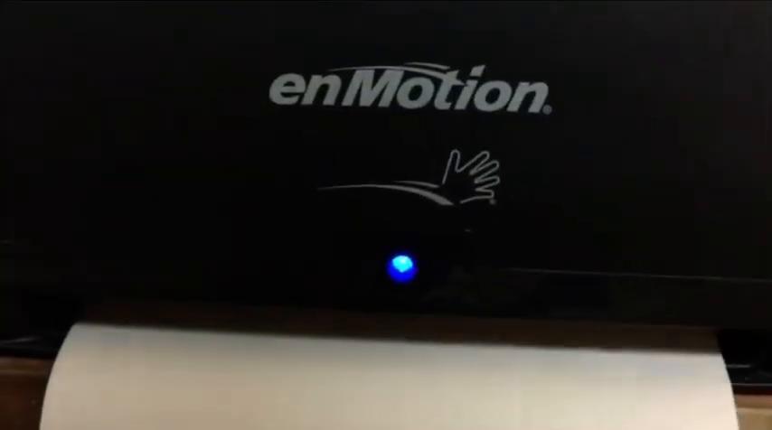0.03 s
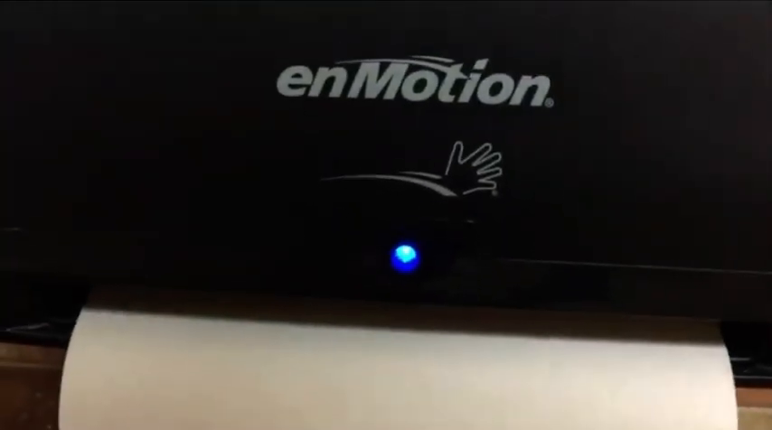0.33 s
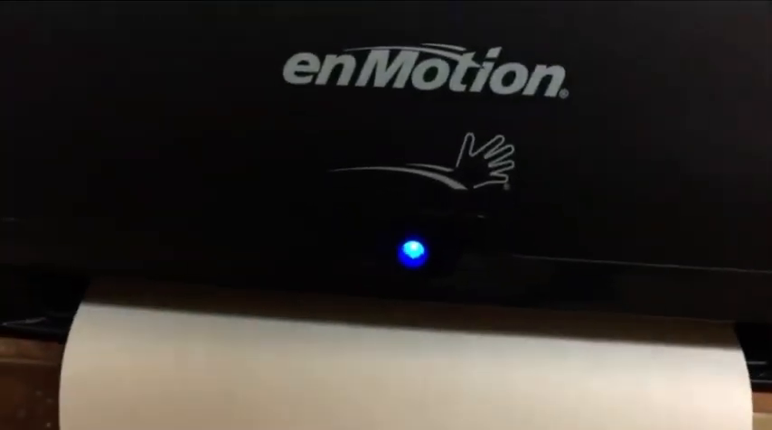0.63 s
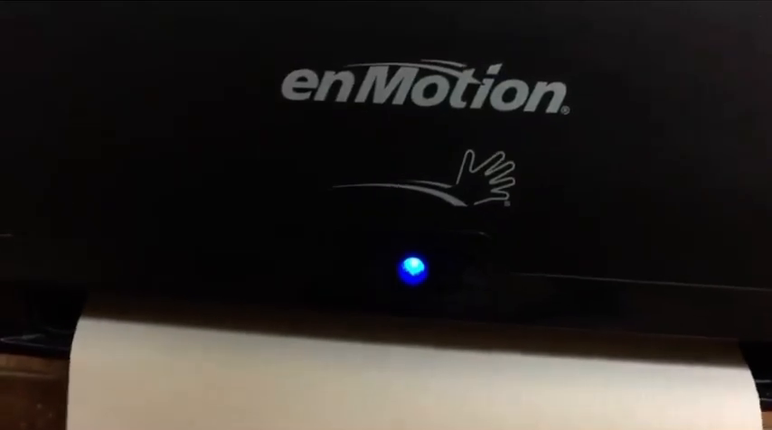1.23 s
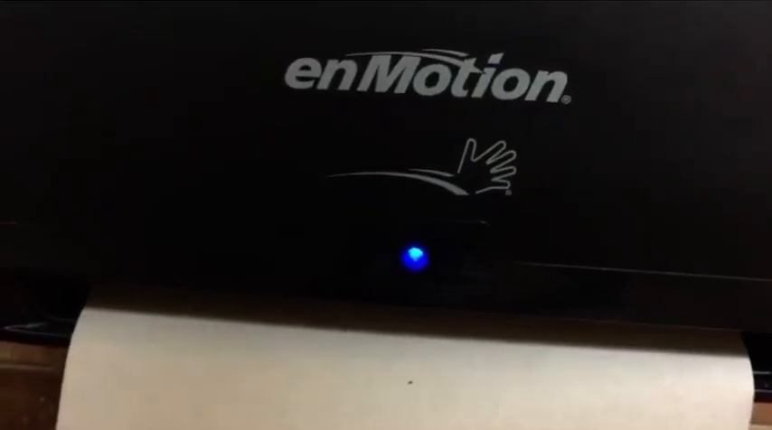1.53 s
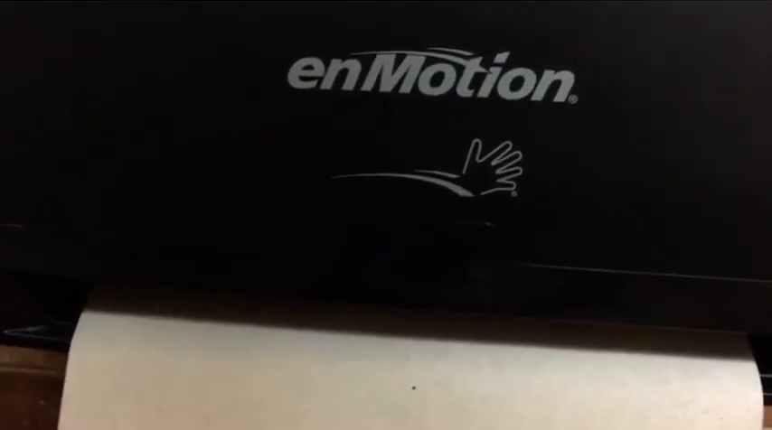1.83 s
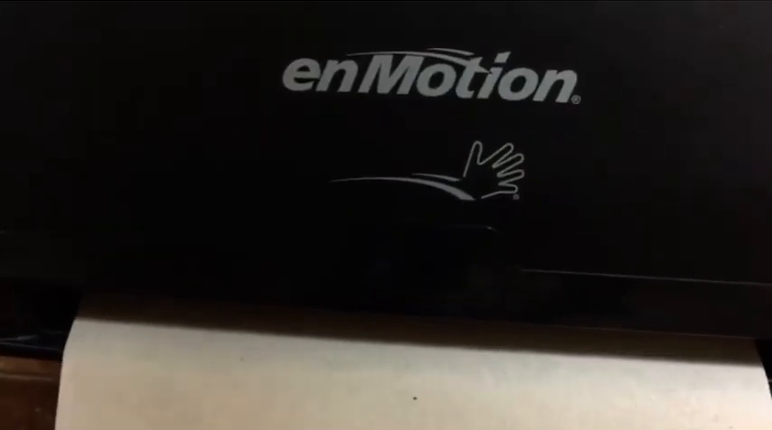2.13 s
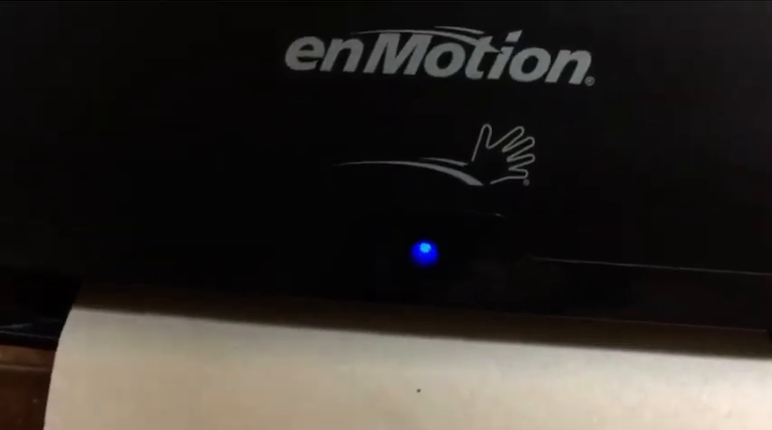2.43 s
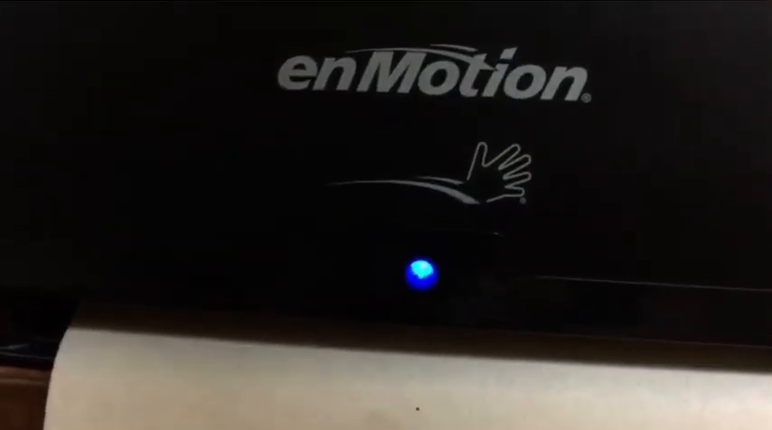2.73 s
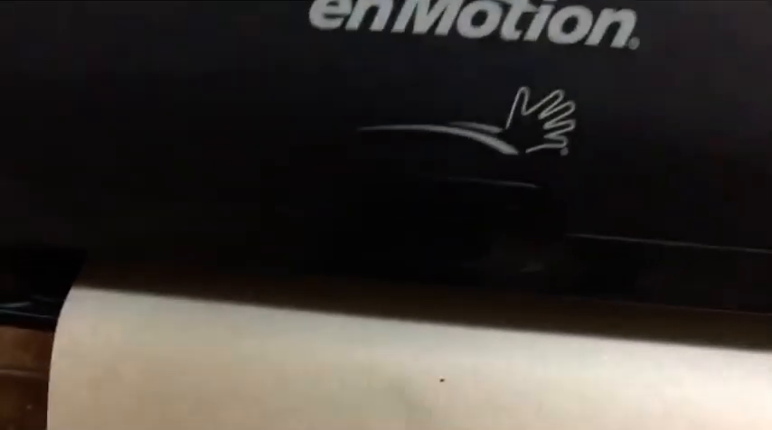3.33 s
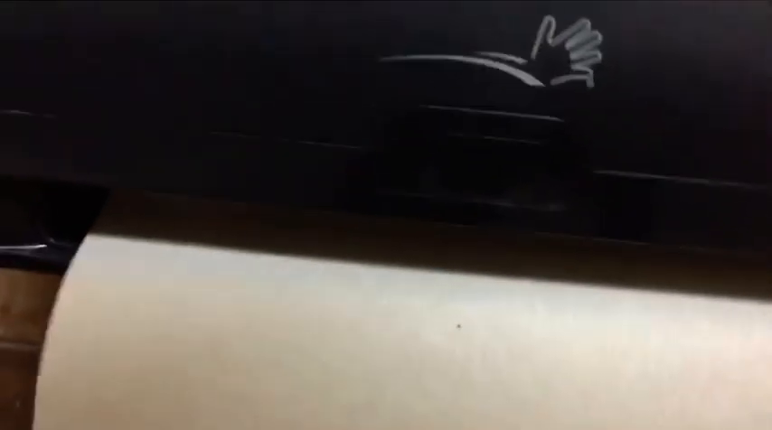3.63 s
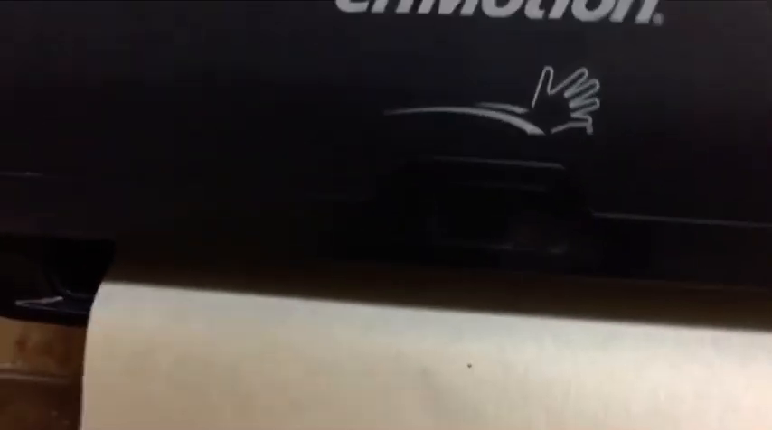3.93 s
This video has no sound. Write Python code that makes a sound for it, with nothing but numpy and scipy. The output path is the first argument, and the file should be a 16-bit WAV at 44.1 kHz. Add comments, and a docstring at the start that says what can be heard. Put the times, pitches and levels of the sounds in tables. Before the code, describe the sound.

A paper towel dispenser motor whines and chatters close by from the start, with paper hissing over the rollers, sagging slightly before stopping at about 1.4 seconds. Two quick handling swishes come at 2.2 and 2.4 seconds, the first with a dull thud, the second ending in a plastic clack. Soft paper rustling follows from 3.5 to 4 seconds. A ventilation fan drones throughout in the small room.

```python
"""A geared motor whines and chatters as a paper towel dispenser feeds out a sheet, close by.
Its gear teeth ring the plastic housing and paper hisses over the rollers; it sags under load and stops.
Then come two swishes of handling, a clack of the plastic cover and some soft rustling.
The place is a small room with a droning ventilation fan, heard in mono from one microphone position."""
import sys
import numpy as np
from scipy import signal
from scipy.fft import rfft, irfft, next_fast_len
from scipy.io import wavfile
from scipy.ndimage import uniform_filter1d

SR = 44100
rng = np.random.default_rng(int(sys.argv[2]) if len(sys.argv) > 2 else 0)


def to_wav(sig):
    """Store sig (one row per channel, or 1-D mono) as 16-bit WAV at the path in sys.argv[1].

    Samples outside -1..1 are clipped; the rate is SR.
    """
    pcm = np.clip(np.atleast_2d(sig), -1, 1) * 32767
    pcm = np.round(pcm).astype(np.int16)
    wavfile.write(sys.argv[1], SR, pcm.T)  # frames by channels


N = 176400

# motor speed, as the rate at which gear teeth meet (time [s], rate [Hz])
MESH_RATE = [(0, 836.7), (.13, 828.6), (.21, 811.5), (.3, 825.1), (.4, 838.4), (.55, 833.2), (.6, 816.4),
             (.66, 823.3), (.71, 809.4), (.77, 827.5), (.85, 843.3), (.95, 816.3), (1.02, 800.8),
             (1.1, 784), (1.16, 800.8), (1.22, 823.6), (1.3, 838.4), (1.45, 844.4)]
# gear whine (multiple of the mesh rate, relative level [dB], gain as the motor sags [dB/Hz])
WHINE_PARTIALS = [(1, -49, 0), (2, -55.5, 0.2879), (3, -54.5, 0.02), (4, -50.5, -0.0183), (5, -55, 0)]
# side tones from uneven teeth (multiple of the shaft rate, relative level [dB])
SHAFT_TONES = [(6, -63), (9, -61), (10, -69), (15, -55.5), (17, -57), (20, -70), (31, -62)]
# the housing reinforces partials that pass through these (centre [Hz], width [Hz], gain [dB])
WHINE_RESONANCES = [(1578, 50, 3.5), (3386, 120, 5.5)]
# the lowest partial swells and fades (time [s], gain [dB])
WHINE_SWELL = [(0, -4), (.06, 4), (.11, -3.5), (.17, 3.5), (.23, -6), (.29, 5.5), (.35, 0), (.5, -3),
               (.58, 1), (.68, 0), (.735, 8), (.83, -5), (.92, 1.5), (.99, -6), (1.1, 3.5), (1.16, 1),
               (1.22, 8.5), (1.3, -3)]
# rise and fall of the whole whine (time [s], gain [dB])
WHINE_DRIVE = [(0, -10.5), (.14, -3), (.25, -2), (1.25, -3.5), (1.31, -10.5), (1.36, -29), (1.45, -75)]
TEETH, FREE_MESH_HZ, WAVER_DB = 8, 838, 2.0

def whine(mesh_hz, mesh_cycles):
    """Partials of the tooth rate, the second squealing under load, with rougher side tones of the shaft."""
    out, sag_hz = np.zeros(N), FREE_MESH_HZ - mesh_hz
    for k, db, db_per_hz in WHINE_PARTIALS:
        housing_db = resonances(k * mesh_hz, WHINE_RESONANCES)
        swell_db = curve(WHINE_SWELL) if k == 1 else 0
        level = amp(db + db_per_hz * sag_hz + housing_db + swell_db + WAVER_DB * drift(rate_hz=47))
        out += level * np.sin(2 * np.pi * (k * mesh_cycles + rng.random()))
    for k, db in SHAFT_TONES:
        level = amp(db) * drift(rate_hz=59)
        out += level * np.sin(2 * np.pi * (k * mesh_cycles / TEETH + rng.random()))
    return np.sqrt(2) * out * amp(curve(WHINE_DRIVE))

# tooth chatter (time [s], level [dB])
CHATTER_LEVEL = [(0, -52), (.12, -49), (.17, -45), (.6, -47), (.73, -43), (.85, -44.5), (1.08, -45),
                 (1.25, -46), (1.35, -44), (1.385, -50), (1.43, -63.5), (1.52, -69), (1.6, -120)]
# its spectrum (frequency [Hz], relative level [dB])
CHATTER_COLOUR = [(100, -28), (300, 0), (550, -3.5), (730, -2.5), (950, 4.5), (1400, 0.5), (2800, -4.5),
                  (4000, -7), (7000, -22), (8500, -21), (14000, -24)]
# resonances of the housing, also heard in the paper feed (centre [Hz], width [Hz], gain [dB])
HOUSING = [(642.7, 23, 11.5), (1022, 17, 5.5), (1646, 70, -4.5), (1703, 30, 7), (2050, 140, 5.5),
           (2540, 77, 3.5), (2780, 150, 6), (3310, 330, 6.5), (3900, 330, 0.5), (5470, 300, 5),
           (6350, 180, 6.5), (6920, 460, 7), (8500, 430, 3.5), (11400, 760, 2)]

def chatter(mesh_cycles, uneven_db=3, shaft_pulse_db=1.8, flutter_db=1.3):
    """Each tooth strikes and scrapes with its own force, ringing the housing."""
    contacts = np.diff(np.floor(mesh_cycles), prepend=0)
    strikes = contacts * rng.standard_normal(N) * amp(uneven_db * (2 * rng.random(N) - 1))
    scrape = rng.standard_normal(N)
    shaft_pulse = np.sin(2 * np.pi * mesh_cycles / TEETH)
    force = (unit(strikes) + scrape) * amp(shaft_pulse_db * shaft_pulse + flutter_db * drift(rate_hz=32))
    return colour(unit(force), CHATTER_COLOUR, HOUSING) * amp(curve(CHATTER_LEVEL))

# paper sliding over the rollers (time [s], level [dB])
FEED_LEVEL = [(0, -42.5), (.09, -44), (.2, -43.5), (.3, -47), (.5, -45), (.82, -47), (.97, -43),
              (1.15, -45), (1.28, -45.5), (1.315, -55.5), (1.345, -50.5), (1.385, -63), (1.43, -78),
              (1.52, -71), (1.6, -120)]
# its spectrum (frequency [Hz], relative level [dB])
FEED_COLOUR = [(200, -32.5), (900, -6), (2000, 0.5), (3000, -0.5), (4500, 4), (6000, -1), (7200, -3),
               (8000, -8.5), (10000, -10), (12000, -10), (14000, -15.5)]

def paper_feed():
    """Paper hisses and crackles over the rollers, changing colour as it flexes."""
    slips = flexing(friction(N, per_s=2200, spread_db=3, hiss=.8), depth_db=2.0)
    return colour(unit(slips), FEED_COLOUR, HOUSING) * amp(curve(FEED_LEVEL))

def flexing(x, depth_db):
    """The flexing sheet shifts its hiss in patches, each some 900 Hz wide and 45 ms long."""
    spectra = signal.stft(x, nperseg=256)[2]
    patches = uniform_filter1d(rng.standard_normal(spectra.shape), size=5, axis=0)
    patches = uniform_filter1d(patches, size=15, axis=1)
    return signal.istft(spectra * amp(depth_db * unit(patches)), nperseg=256)[1][:len(x)]

# rubs and groans (peak time [s], length [s], centre [Hz], width [Hz], level [dB])
RUBS = [(.09, 0.22, 2530, 500, -46.5), (0.105, .18, 4350, 1300, -44.5), (0.164, .08, 534, 80, -56),
        (.205, 0.074, 6700, 600, -53), (0.556, .045, 3920, 885, -46.5), (0.956, 0.11, 4900, 1500, -48),
        (1.021, 0.047, 516, 90, -48), (1.381, 0.077, 1000, 50, -48.5), (1.427, 0.41, 974, 40, -65),
        (1.477, 0.22, 2940, 400, -69), (1.712, .09, 1660, 200, -63), (1.725, 0.25, 2900, 900, -69.5),
        (1.799, 0.083, 2880, 600, -62.5), (2.241, .06, 650, 59.6, -44.5), (2.594, 0.17, 2800, 705, -67),
        (3.567, 0.037, 1090, 400, -56.5), (3.73, 0.048, 2260, 400, -59), (3.779, 0.034, 4150, 500, -63)]

def rubs(skirt=0.74):
    """Roller, paper and cover rub: noise swells briefly in one resonance with a broad skirt."""
    out = np.zeros(N)
    for s, length, hz, width, db in RUBS:
        n, resonator = int(length * SR), signal.iirpeak(hz, hz / width, fs=SR)
        broad = signal.lfilter(*resonator, rng.standard_normal(SR))
        narrow = signal.lfilter(*resonator, broad)
        add(out, s - length / 2, amp(db) * np.hanning(n) * unit((narrow + skirt * broad)[-n:]))
    return out

# swishes of handling (peak time [s], rise [s], fall [s], level [dB], tilt [dB/octave])
SWISHES = [(2.18, 0.021, 0.04, -57.5, 0), (2.197, 0.011, 0.024, -45.5, -1), (2.222, 0.038, 0.016, -38.5, 0),
           (2.35, 0.029, 0.045, -47.5, 1.5), (2.375, 0.038, 0.03, -44, -3.5),
           (2.405, 0.02, 0.026, -45.5, -3.5)]
# their spectrum (frequency [Hz], relative level [dB])
SWISH_COLOUR = [(150, -17), (500, -3.5), (1200, 0), (2700, 5), (4000, -5.5), (6000, -8), (8500, -13.5),
                (10500, -17), (12000, -14), (14000, -19)]
# soft rustles (peak time [s], rise [s], fall [s], level [dB], tilt [dB/octave])
RUSTLES = [(3.497, 0.023, 0.044, -57, 1), (3.535, 0.07, 0.057, -54.5, 1.5),
           (3.565, 0.039, 0.088, -53.5, -1), (3.595, 0.04, 0.059, -55, 3), (3.615, 0.041, 0.039, -47, -5.5),
           (3.66, 0.03, 0.038, -57, 2), (3.69, 0.026, 0.043, -54.5, -1), (3.74, 0.062, 0.065, -54, 0.5),
           (3.782, 0.068, 0.048, -60.5, 4.5), (3.85, 0.074, 0.072, -63, 4), (3.995, 0.076, .06, -63, 4.5)]
# their spectrum (frequency [Hz], relative level [dB])
RUSTLE_COLOUR = [(200, 17.5), (700, 1.5), (2400, 6), (3500, -2), (6000, -4.5), (9000, -7), (10300, -15),
                 (12500, -11.5), (14000, -17)]

def strokes(rows, spectrum, flutter_db, fold_db):
    """Rubbing strokes swell and fade by 20 dB over rise and fall, each with its own small resonances."""
    out, t = np.zeros(N), np.arange(-SR // 5, SR // 4) / SR
    for s, rise, fall, db, tilt in rows:
        slips = friction(len(t), per_s=5400, spread_db=0.5, hiss=0.47)
        slips *= amp(flutter_db * drift(rate_hz=120)[:len(t)])
        folds = [(1000 * 13 ** pitch, 60 + 350 * pitch, fold_db * (2 * height - 1))
                 for pitch, height in rng.random((30, 2))]
        envelope = amp(db - 20 * np.maximum(-t / rise, t / fall) ** 1.31)
        add(out, s + t[0], colour(unit(slips), spectrum, folds, tilt) * envelope)
    return out

# crinkles of the paper (time [s], level [dB], tilt [dB/octave])
CRINKLES = [(.089, -49, -2), (.399, -45, 4), (0.491, -50, 3), (.602, -47, 2), (.828, -42, -6),
            (1.029, -53, 2), (1.266, -47, 4), (2.193, -55, -6.5), (3.534, -52.5, -4), (3.56, -51, -13),
            (3.655, -62, -5), (3.686, -52, -7), (3.72, -59, -8), (3.735, -62, -3)]
# their spectrum (frequency [Hz], relative level [dB])
CRINKLE_COLOUR = [(300, -28), (1800, -2), (5000, -11.5), (9000, -6.5), (14000, -7)]

def crinkles(decay_s=0.0045):
    """The sheet buckles in short clusters of snaps."""
    out, t = np.zeros(N), np.arange(SR // 15) / SR
    for s, db, tilt in CRINKLES:
        snaps = friction(len(t), per_s=3000, spread_db=2, hiss=.6) * np.exp(-t / decay_s)
        add(out, s, amp(db) * colour(snaps, CRINKLE_COLOUR, tilt=tilt))
    return out

# knocks on the plastic (time [s], relative level [dB], tilt [dB/octave])
KNOCKS = [(2.216, -13.5, -2.5), (2.225, -13, -9), (2.412, -2, 0), (2.4155, -3, 1.5), (2.421, -5.5, -2),
          (2.428, -9.5, -8.5), (2.444, -11, -8)]
# modes of the plastic (frequency [Hz], relative level [dB], t60 before t60_scale [s])
PLASTIC_MODES = [(345, -14.5, 0.15), (511, -16, 0.12), (633, -11, 0.096), (780, -6.5, .13),
                 (1050, -11, 0.19), (1147, 3, 0.07), (1261, -4, 0.19), (1510, -5, 0.1), (1575, -1, 0.072),
                 (1744, -19, 0.095), (1884, -17, 0.094), (1975, -3, 0.1), (2630, -4, 0.02),
                 (3200, 1.5, 0.026), (3460, -6, .03)]
# spectrum of the crack (frequency [Hz], relative level [dB])
CRACK_COLOUR = [(150, -16), (500, 0.5), (1000, 4), (2000, 5), (3300, -5.5), (4800, -17), (5800, -13),
                (7000, -16), (8500, -23), (14000, -43)]

def knocks(ring_db=-30, attack_s=0.0019, t60_scale=0.76, crack_db=-27.5, crack_s=0.0037):
    """Each knock gives a short crack and rings the modes of the plastic."""
    out, t = np.zeros(N), np.arange(SR // 3) / SR
    attack = 1 - np.exp(-t / attack_s)
    for s, db, tilt in KNOCKS:
        ring = np.zeros(len(t))
        for hz, mode_db, t60 in PLASTIC_MODES:
            envelope = amp(mode_db + tilt * np.log2(hz / 1000) - 60 * t / (t60 * t60_scale))
            ring += envelope * np.sin(2 * np.pi * (hz * t + rng.random()))
        crack = colour(rng.standard_normal(len(t)) * np.exp(-t / crack_s), CRACK_COLOUR, tilt=tilt)
        add(out, s, amp(db) * (amp(ring_db) * ring * attack / 2 + amp(crack_db) * crack))
    return out

# thuds of the cover (time [s], level [dB])
THUDS = [(2.213, -33.5), (2.241, -38.5), (2.258, -37), (2.414, -39), (2.429, -42)]
# their spectrum (frequency [Hz], relative level [dB])
THUD_COLOUR = [(60, -16), (170, 15), (250, 7.5), (330, -2), (410, 4), (520, -8), (650, -21), (850, -5.5),
               (1500, -32), (5000, -62)]

def thuds(attack_s=0.0046, decay_s=0.018):
    """The hollow cover booms briefly when it is pushed."""
    out, t = np.zeros(N), np.arange(SR // 4) / SR
    envelope = np.exp(-t / decay_s) * (1 - np.exp(-t / attack_s))
    for s, db in THUDS:
        add(out, s, amp(db) * unit(colour(rng.standard_normal(len(t)), THUD_COLOUR)) * envelope)
    return out

# tiny ticks and the bright snap within the clack (time [s], level [dB], tilt [dB/octave])
TICKS = [(2.413, -39, -8), (2.4152, -35, -3), (2.675, -61, 4), (3.781, -49, -2), (3.871, -52, -7)]
# their spectrum (frequency [Hz], relative level [dB])
TICK_COLOUR = [(500, -31), (3000, -3), (4800, -28), (5700, 19), (7000, 8), (8500, -13), (14000, -22)]

def ticks(decay_s=0.00086):
    """Small dry snaps, each a burst of noise that dies at once."""
    out, t = np.zeros(N), np.arange(SR // 20) / SR
    for s, db, tilt in TICKS:
        burst = rng.standard_normal(len(t)) * np.exp(-t / decay_s)
        add(out, s, amp(db) * colour(burst, TICK_COLOUR, tilt=tilt))
    return out

# air noise of the fan (frequency [Hz], relative level [dB])
AIR_COLOUR = [(20, 2.5), (32, -43), (43, 7), (62, 9), (85, 7.5), (112, 5), (160, 6), (215, 1), (290, -6),
              (380, -13), (500, -21.5), (1000, -23), (2000, -28), (3800, -32.5), (5000, -37), (9000, -42),
              (14000, -45.5)]
# resonances of the duct (centre [Hz], width [Hz], gain [dB])
DUCT = [(94.4, 8.7, 9.2), (134.8, 20.8, 14.1), (198.8, 3.7, 6.6), (250.8, 21.3, 11.46), (363, 21, 4.9)]

def ventilation(level_db=-43.5):
    """Room tone behind the dispenser: steady air noise droning in duct resonances."""
    lead = SR // 4  # lets the drone build up
    return amp(level_db) * unit(colour(rng.standard_normal(N + lead), AIR_COLOUR, DUCT)[lead:])

# reverberation of the small room (frequency [Hz], t60 [s])
ROOM_DECAY = [(200, 0.44), (600, 0.35), (1200, 0.39), (2500, 0.29), (5000, 0.21), (12000, 0.23)]

def room(x, wet_db, near_db=-11, near_s=.014, echoes=1500):
    """At the microphone: direct sound, the nearby wall and counter, then a tail whose treble dies first."""
    taps = np.zeros(SR)
    taps[150 + 20 * np.arange(echoes) + rng.integers(0, 20, echoes)] = rng.choice([-1., 1.], echoes)
    hz, t, spectra = signal.stft(taps, SR, nperseg=256)
    decay = amp(-60 * t / at_hz(ROOM_DECAY, hz)[:, None])
    tail = signal.istft(spectra * decay, SR, nperseg=256)[1]
    near = np.zeros(len(tail))
    near[(near_s * SR * rng.uniform(.1, 1, size=8)).astype(int)] = rng.choice([-1., 1.], size=8)
    near = signal.lfilter(*signal.butter(1, 2500, "high", fs=SR), near / np.linalg.norm(near))
    response = amp(wet_db) * tail / np.linalg.norm(tail) + amp(near_db) * near
    return x + signal.fftconvolve(x, response)[:N]

def friction(n, per_s, spread_db, hiss):
    """Tiny slips of uneven size over a smooth hiss."""
    chance, size, noise = rng.random(n), rng.exponential(1, n), rng.standard_normal(n)
    slips = np.sign(noise) * (chance < per_s / SR) * amp(spread_db * np.minimum(size, 4))
    return unit(unit(slips) + hiss * rng.standard_normal(n))

def colour(x, spectrum, peaks=(), tilt=0):
    """Causal filter from a spectrum, resonances and a tilt; keeps the power."""
    size = next_fast_len(len(x) + 4096, True) * 2
    hz = np.fft.rfftfreq(size, 1 / SR)
    db = at_hz(spectrum, hz) + resonances(hz, peaks) + tilt * np.log2(np.maximum(hz, 400))
    cepstrum = irfft(np.log(amp(db - db.max()) + 1e-6))
    cepstrum[1:size // 2] *= 2  # minimum phase: ringing follows the strike
    cepstrum[size // 2 + 1:] = 0
    filtered = irfft(rfft(x, size) * np.exp(rfft(cepstrum)))[:len(x)]
    return unit(filtered) * np.sqrt(np.mean(x ** 2))

def resonances(hz, peaks):
    """Summed gain of bell-shaped peaks, in dB."""
    return sum(db / (1 + (2 * (hz - centre) / width) ** 2) for centre, width, db in peaks)

def drift(rate_hz):
    """Smooth random wander of rms 1."""
    hz = np.fft.rfftfreq(N, 1 / SR)
    return unit(irfft(rfft(rng.standard_normal(N)) * np.exp(-(hz / rate_hz) ** 2), N))

def curve(points):
    """Joins (time [s], value) points by straight lines."""
    return np.interp(np.arange(N) / SR, *np.transpose(points))

def at_hz(points, hz):
    """Reads (frequency [Hz], value) points on a log-frequency axis."""
    f, value = np.transpose(points)
    return np.interp(np.log(hz + 1), np.log(f + 1), value)

def add(mix, s, sound):
    """Mixes a sound in at a time."""
    part = mix[max(round(s * SR), 0):][:len(sound)]
    part += sound[:len(part)]

def amp(db):
    """Decibels to gain."""
    return 10 ** (np.asarray(db) / 20)

def unit(x):
    """Scales to rms 1."""
    return x / np.sqrt(np.mean(x ** 2) + 1e-20)

def scene():
    """Motor, paper and handling close by, louder than their echoes, with the fan behind."""
    mesh_hz = curve(MESH_RATE)
    jitter = 1 + .004 * drift(rate_hz=60)
    mesh_cycles = np.cumsum(mesh_hz * jitter) / SR
    motor = room(whine(mesh_hz, mesh_cycles), wet_db=-9.5)
    mechanism = room(chatter(mesh_cycles) + paper_feed() + rubs(), wet_db=-10.5)
    swishes = strokes(SWISHES, SWISH_COLOUR, flutter_db=1.8, fold_db=2.5)
    rustles = strokes(RUSTLES, RUSTLE_COLOUR, flutter_db=0, fold_db=5.5)
    handling = room(swishes + rustles + crinkles(), wet_db=-10.5)
    impacts = room(knocks() + thuds(), wet_db=-8, near_db=-15) + room(ticks(), wet_db=-15)
    return (motor + mechanism + handling + impacts + ventilation())[None]

def record(dry):
    """The recorder's band limit."""
    cutoff_hz = 13900
    lowpass = signal.firwin(1201, cutoff_hz, window=("kaiser", 8), fs=SR)
    return signal.oaconvolve(dry, lowpass[None], "same")

dry = scene()
out = record(dry)
to_wav(out)
```